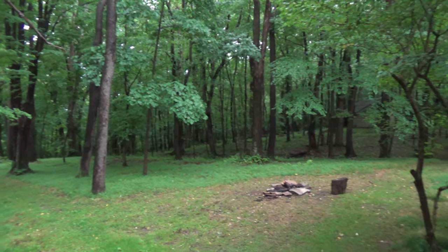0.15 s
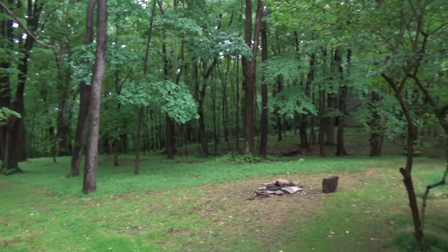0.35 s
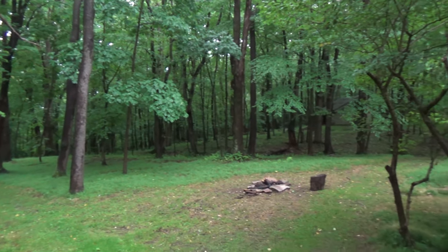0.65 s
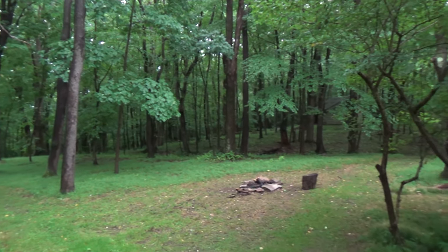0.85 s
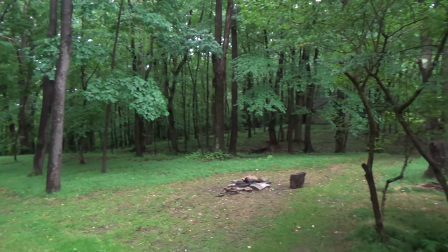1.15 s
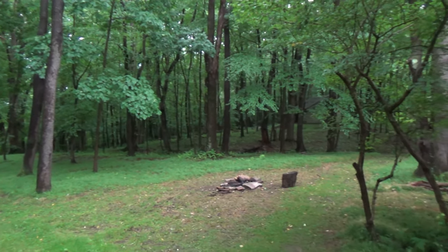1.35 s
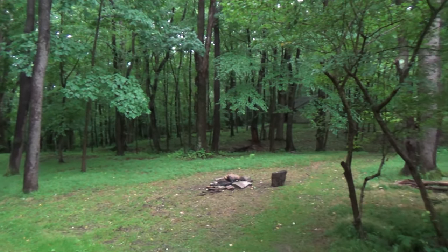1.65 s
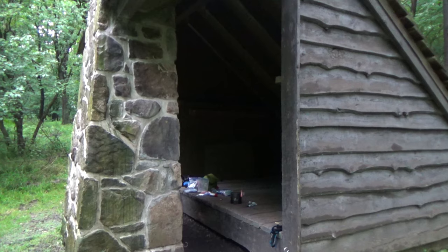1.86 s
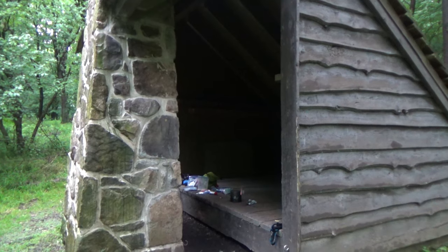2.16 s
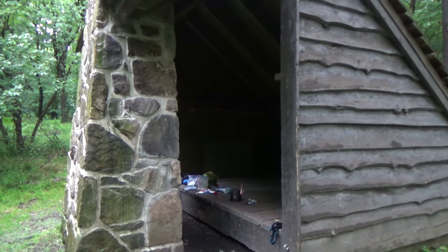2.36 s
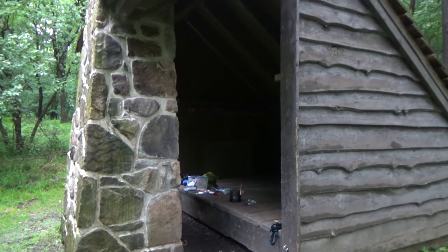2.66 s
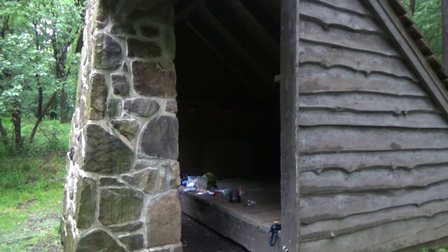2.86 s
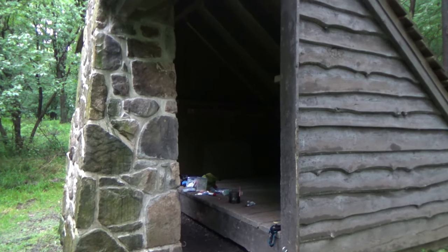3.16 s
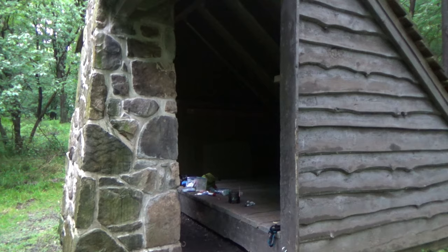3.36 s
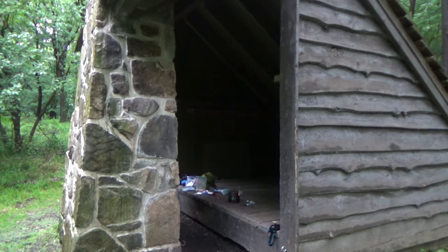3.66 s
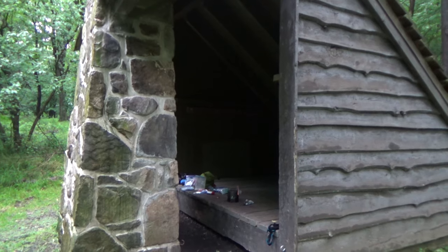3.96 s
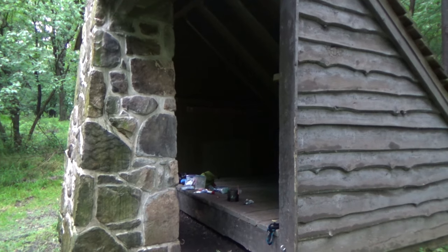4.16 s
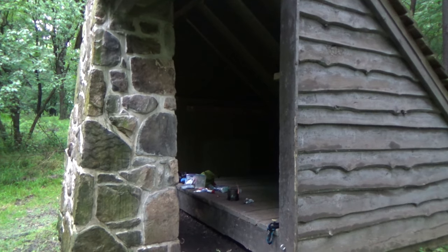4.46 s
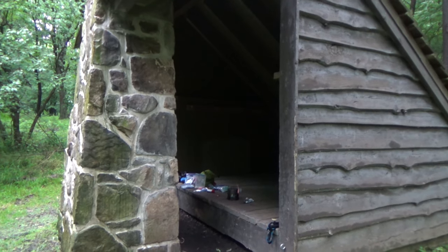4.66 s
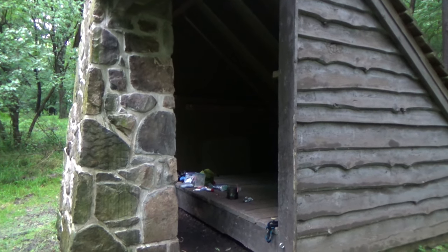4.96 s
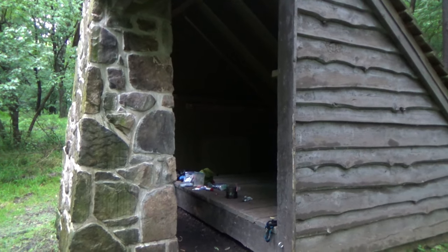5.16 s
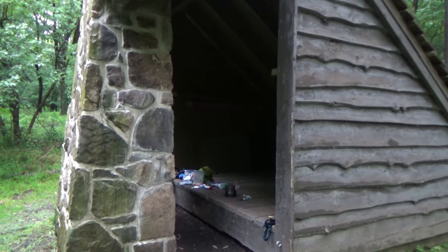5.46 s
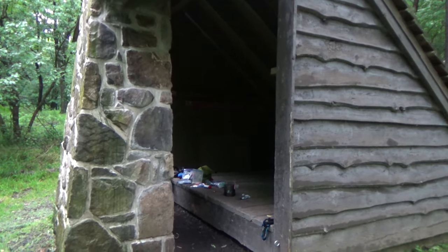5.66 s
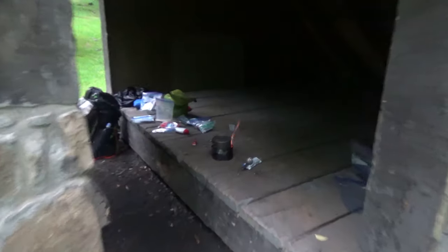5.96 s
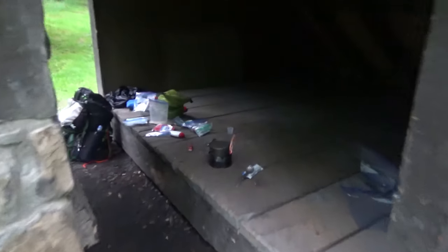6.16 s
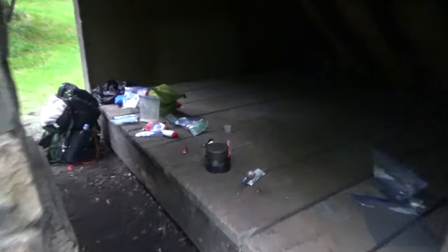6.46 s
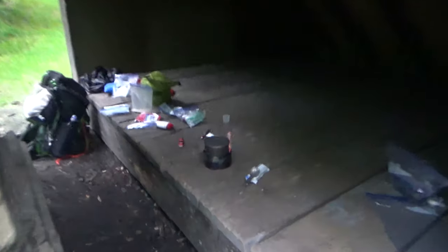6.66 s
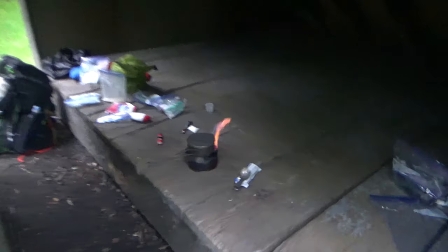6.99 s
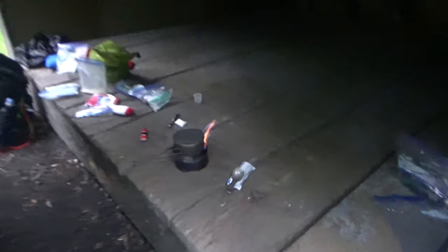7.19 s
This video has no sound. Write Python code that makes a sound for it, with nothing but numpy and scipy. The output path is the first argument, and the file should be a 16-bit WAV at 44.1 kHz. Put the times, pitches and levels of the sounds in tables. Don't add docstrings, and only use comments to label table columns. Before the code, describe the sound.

Three outdoor shots joined by hard cuts. First, sparse distant birdsong in a reverberant wood, with faint camera-body clicks. Next, brighter chirps and a steady two-second trill, about thirteen syllables a second, over a faint low engine drone. Last, a sharp, hard footstep among loose stones, gritty scraping, a second softer step and one final clack. Hissy stereo camera microphone, leaf rustle and far traffic throughout.

```python
import sys
import numpy as np
from scipy import signal
from scipy.io import wavfile
from scipy.ndimage import uniform_filter1d

SR = 44100
rng = np.random.default_rng(int(sys.argv[2]) if len(sys.argv) > 2 else 0)


def decibels_to_gain(level_db):
    exponent = np.asarray(level_db, float) / 20
    return 10 ** exponent


def to_wav(sig):
    pcm = np.clip(np.atleast_2d(sig), -1, 1) * 32767
    pcm = np.round(pcm).astype(np.int16)
    wavfile.write(sys.argv[1], SR, pcm.T)


N = 323208

CUTS = [0, 1.862, 5.9285]


def evened(x):
    return x / np.sqrt(np.mean(x ** 2) + 1e-20)


def slow_noise(count, size):
    noise = uniform_filter1d(rng.standard_normal(count), size=size)
    return evened(uniform_filter1d(noise, size=size))


def read(points, hz):
    f, value = np.transpose(points)
    return np.interp(np.log(hz + 1), np.log(f + 1), value)


def curves(rows, t):
    s, *columns = np.transpose(rows)
    return [np.interp(t, s, c) for c in columns]


def add(mix, s, sound, pan_db=0):
    part = mix[:, round(s * SR):][:, :len(sound)]
    part += sound[:part.shape[1]] * decibels_to_gain(np.array([[pan_db / 2], [-pan_db / 2]]))


def side_share(likeness):
    return np.sqrt((1 - likeness) / (1 + likeness))


def resonate(x, hz, width):
    turn = np.exp(2j * np.pi * np.cumsum(hz * np.ones(len(x))) / SR)
    r = np.exp(-np.pi * width / SR)
    return 2 * (turn * signal.lfilter([1 - r], [1, -r], x / turn)).real


def coloured(x, points):
    level_db = read(points, abs(np.fft.fftfreq(4096, 1 / SR)))
    log_gain = np.log(decibels_to_gain(np.maximum(level_db, -100)))
    taps = np.fft.ifft(np.exp(np.conj(signal.hilbert(log_gain)))).real[:1024]
    return evened(signal.oaconvolve(x, taps[None], axes=1)[:, :N])


SHAKE = slow_noise(SR, 60)


def glide(length, start_hz, end_hz, burr_hz, bend, taper):
    u = np.linspace(0, 1, int(length * SR) + 2)
    wobble = np.roll(SHAKE, int(start_hz * 7.0))[:len(u)]
    hz = start_hz + (end_hz - start_hz) * u ** bend + burr_hz * 2 * np.tanh(wobble / 2)
    tone = np.sqrt(2) * np.sin(2 * np.pi * np.cumsum(hz) / SR)
    return tone * signal.windows.tukey(len(u), taper) * decibels_to_gain(-3 * u)


# (frequency [Hz], t60 [s])
TRUNKS = [(1500, 0.69), (4000, 1), (9000, 0.67)]


def trees(x, direct_db, likeness, depth, flutter_db):
    taps = np.zeros((2, SR))
    at = np.arange(200, SR - 20, 20) + rng.integers(0, 20, (2, (SR - 201) // 20))
    np.put_along_axis(taps, at, rng.choice([-1., 1.], at.shape), 1)
    hz, t, z = signal.stft(taps, SR, nperseg=256)
    decay = decibels_to_gain(-60 * t / depth / read(TRUNKS, hz)[:, None])
    mid, side = signal.istft(z * decay, SR, nperseg=256)[1]
    side = side_share(likeness) * side
    tail = np.array([mid + side, mid - side])
    tail = tail / np.linalg.norm(tail[0])
    out = decibels_to_gain(direct_db) * x
    flutter = decibels_to_gain(flutter_db * slow_noise(N, 600))
    edges = [round(s * SR) for s in CUTS] + [N]
    for a, b in zip(edges, edges[1:]):
        echo = signal.fftconvolve(x[:, a:b], tail, axes=1)[:, :b - a]
        out[:, a:b] += echo * flutter[a:b]
    return out


# (time [s], length [s], start [Hz], end [Hz], level [dB])
LOW_BIRD = [(0.2, 0.12, 2080, 1943, -69.5), (0.35, 0.14, 1950, 1860, -72), (1.24, 0.062, 2270, 2180, -59),
            (1.33, .05, 2195, 2185, -64), (1.42, .09, 2190, 2175, -68), (1.53, 0.021, 2050, 1900, -67),
            (3.335, 0.055, 2290, 1960, -64), (3.39, 0.11, 1990, 1890, -70), (3.58, 0.076, 2770, 2710, -68),
            (4.65, 0.13, 2166, 2116, -69), (4.885, 0.04, 1900, 1850, -63.5), (4.985, .03, 1880, 1850, -66),
            (4.92, 0.067, 2210, 2216, -56.5), (4.98, 0.03, 2200, 2196, -58), (5.06, 0.034, 1870, 1840, -65),
            (5.14, 0.032, 2180, 2210, -72)]
MIDDLE_BIRD = [(0.0, 0.18, 3504, 2486, -68), (0.8, 0.052, 3150, 3450, -64), (0.83, 0.06, 3250, 3900, -59),
               (0.875, 0.045, 4050, 4300, -63), (0.9, 0.058, 4090, 4400, -60),
               (0.939, 0.26, 4410, 4460, -65.5), (1.56, 0.057, 3660, 3490, -59),
               (1.59, 0.056, 3460, 2940, -60), (1.62, 0.07, 3130, 2394, -62),
               (1.78, 0.074, 2650, 3070, -63), (2.83, .08, 4410, 3220, -67), (2.9, 0.05, 2650, 3004, -58),
               (2.97, 0.045, 2906, 2310, -65), (3.11, 0.1, 2900, 3300, -70), (3.497, .015, 1900, 3030, -51),
               (3.51, 0.06, 2950, 3240, -57), (3.56, 0.044, 3130, 2960, -60),
               (3.58, 0.054, 3300, 3950, -61.5), (4.45, 0.086, 2805, 3430, -55),
               (4.51, 0.086, 3330, 4220, -55), (4.52, 0.096, 3200, 2254, -56.5),
               (4.6, 0.087, 4080, 4470, -59), (4.89, 0.067, 2850, 2610, -61), (5.0, 0.12, 2594, 3700, -61),
               (5.14, .12, 3800, 2700, -63), (5.78, 0.07, 3540, 3440, -63),
               (5.795, 0.088, 3180, 2430, -59.5)]
HIGH_BIRD = [(1.6, 0.2, 5090, 4570, -72), (1.78, 0.068, 5280, 4560, -70), (1.862, 0.091, 7750, 5400, -59),
             (1.98, 0.099, 8200, 7400, -62), (2.042, 0.1, 7320, 7330, -62),
             (2.067, 0.11, 7270, 6260, -58.5), (2.17, 0.1, 4850, 6180, -59.5),
             (2.28, 0.048, 6870, 4600, -58.5), (3.05, 0.2, 4430, 4250, -70), (5.3, 0.12, 5100, 4600, -66),
             (5.62, 0.11, 4600, 4900, -70), (5.72, 0.063, 5360, 4740, -62.5),
             (6.4, 0.12, 3100, 3960, -60.5)]
# (notes, burr of a level note [Hz], added burr [share of the glide])
SINGERS = [
    (LOW_BIRD, 19, .02),
    (MIDDLE_BIRD, 46, 0.245),
    (HIGH_BIRD, 139, 0.111),
]


def far_birds():
    mix = np.zeros((2, N))
    for notes, level_burr_hz, share in SINGERS:
        for s, length, start_hz, end_hz, db in notes:
            burr_hz = level_burr_hz + share * abs(end_hz - start_hz)
            note = glide(length, start_hz, end_hz, burr_hz, bend=.7, taper=0.14)
            add(mix, s, decibels_to_gain(db + 2.5) * note)
    return trees(mix, direct_db=-5.0, likeness=0.5, depth=1.56, flutter_db=1.8)


TRILL_START, TRILL_END, TRILL_PER_S = 3.1546, 4.977, 12.68


def effort(full_db, shy_db, settle_s, swell_db):
    t = np.arange(N) / SR
    shortfall_db = shy_db * np.exp(-np.maximum(t - TRILL_START, 0) / settle_s)
    stop_db = 230 * np.maximum(t - TRILL_END, 0)
    return full_db - shortfall_db + swell_db * (t - TRILL_END) - stop_db


# (start [syllable], end [syllable], start [Hz], end [Hz], level [dB])
BUZZ = [
    (0.027, 0.36, 4880, 5600, -3),
    (0.31, 0.651, 5540, 5865, -1),
    (0.619, 1.0, 5602, 4700, -4.5),
    (.3, .55, 6050, 6450, -13),
]
WHISTLE = [
    (0.0998, 0.444, 5900, 5600, -9),
    (0.64, 0.876, 8800, 7450, -1),
    (0.87, 1.06, 8600, 7460, 1.5),
    (0.2, 0.46, 8300, 7500, -7),
    (.56, .7, 8900, 7950, -6),
]
# (full level [dB], shortfall at the start [dB], its time constant [s], swell [dB/s])
BUZZ_EFFORT = (-42, 20, .22, 1)
WHISTLE_EFFORT = (-46.5, 9, 0.34, 3.5)


def trill():
    buzz, whistle = np.zeros((2, 2, N))
    starts = np.arange(TRILL_START, TRILL_END + 1 / TRILL_PER_S, 1 / TRILL_PER_S)
    chance = rng.standard_normal((40, 3))
    for s, (late, sharp, loud) in zip(starts, chance):
        tune = 1 + 0.006 * sharp + .018 * np.exp((TRILL_START - s) / 0.226)
        for mix, parts, burr_hz, bend in ((buzz, BUZZ, 350, .9), (whistle, WHISTLE, 40, .15)):
            for a, b, f0, f1, db in parts:
                note = glide((b - a) / TRILL_PER_S, f0 * tune, f1 * tune, burr_hz, bend, taper=0.16)
                add(mix, s + a / TRILL_PER_S + .002 * late, decibels_to_gain(db + 0.73 * loud) * note)
    buzz = buzz * decibels_to_gain(effort(*BUZZ_EFFORT) - 0.86)
    whistle = whistle * decibels_to_gain(effort(*WHISTLE_EFFORT) + 2.0)
    return trees(buzz + whistle, direct_db=-6.0, likeness=0.71, depth=0.93, flutter_db=0.5)


# (time of full weight [s], rise [s], grinding [dB], release [dB/s], grit re grinding [dB])
SHOVES = [
    (5.972, 0.033, -23, 420, -5.5),
    (5.952, 0.012, -31, 106, 0.5),
    (6.102, .035, -39.5, 112, -4),
    (6.18, .1, -50.5, 10.5, -4.5),
    (5.7, 0.0085, -46.5, 90, -8),
    (6.57, 0.021, -40, 300, 4.5),
    (6.58, 0.07, -40, 46, -6),
    (6.8, 0.21, -42.5, 144, 1),
    (6.87, 0.056, -58, 250, 9),
    (7.316, .03, -49, 400, -6),
]


def shoves(t):
    stone, grit = decibels_to_gain(-69) ** 2, decibels_to_gain(-55) ** 2
    for s, rise_s, db, release_db, grit_db in SHOVES:
        rise = np.clip(1 + (t - s) / rise_s, 0, 1)
        power = (rise * decibels_to_gain(db - release_db * np.maximum(t - s, 0))) ** 2
        stone, grit = stone + power, grit + power * decibels_to_gain(grit_db) ** 2
    return np.sqrt(stone), np.sqrt(grit)


def grains(per_s, spread_db, likeness):
    size = decibels_to_gain(spread_db * np.minimum(rng.exponential(1, N), 3.2)) * (rng.random(N) < per_s / SR)
    size = signal.lfilter([1], [1, -.96], size) + 1.17
    mid, side = rng.standard_normal((2, N)) * size
    side = side_share(likeness) * side
    return np.array([mid + side, mid - side])


# (frequency [Hz], level per Hz [dB])
GRAVEL = [(88, -27.5), (150, -29), (203, -19), (239, -5.5), (300, -10), (600, -11), (657, -2), (2230, -2),
          (2960, 1.5), (5500, -9.5), (7150, -44), (12100, -120)]
GRIT = [(2350, -19), (4000, -4.5), (5700, -3.5), (9490, 3), (11500, -8), (15300, -18), (16000, -58)]
# (time [s], left-right [dB], ring of the stones [Hz])
BOOT = [(5.93, -1, 1600), (5.975, 3.5, 1870), (6.08, 2, 1550), (6.5, 2, 1510), (6.6, 4, 2030),
        (6.68, -3, 2160), (6.81, 4.5, 1700), (6.9, 2, 1080), (7.33, 0.5, 1300)]


def crunch():
    t = np.arange(N) / SR
    (stone, grit), (side_db, ring_hz) = shoves(t), curves(BOOT, t)
    pan_db = .3 * side_db
    grind = coloured(grains(650, 2.4, 0.94), GRAVEL)
    ring = np.array([resonate(resonate(x, ring_hz, 1700), ring_hz, 1700) for x in grind])
    grind = evened(1.1 * grind + ring)
    mix = decibels_to_gain(-2.5) * stone * grind
    mix += decibels_to_gain(-1.86) * grit * coloured(grains(650, 2.3, 0.92), GRIT)
    return mix * decibels_to_gain(np.array([pan_db / 2, -pan_db / 2])) * (t > CUTS[2])


def clicks(rows, turns, bright_t60, rattle_db, low_db, bright_db):
    mix, t = np.zeros((2, N)), np.arange(700) / SR
    chance = rng.standard_normal((len(rows), 700))
    cavity = signal.butter(2, [7200, 11200], "band", fs=SR, output="sos")
    for (s, db, hz, rel_db, pan_db), noise in zip(rows, chance):
        soft = 1 - np.exp(-t * hz * 4)
        low = soft * np.sin(2 * np.pi * hz * t) * decibels_to_gain(low_db - 60 * t * hz / turns)
        rattle = evened(resonate(resonate(noise, hz, 1800), hz, 1000))
        rattle = soft * rattle * decibels_to_gain(rattle_db - 60 * t / 0.033)
        bright = evened(signal.sosfilt(cavity, noise))
        bright = bright * decibels_to_gain(rel_db + bright_db - 60 * t / bright_t60)
        add(mix, s, decibels_to_gain(db) * (low + rattle + bright), pan_db)
    return mix


# (time [s], peak [dB], low ring [Hz], bright part re peak [dB])
STONES = [(5.929, -28, 1920, -27.5), (5.942, -30, 1400, -23), (5.953, -23.5, 930, 3.5),
          (5.9685, -16, 2280, -13), (5.983, -35, 2140, -19), (6.0132, -32, 1590, 0),
          (6.045, -28, 1520, -12), (6.096, -33, 1190, -7), (6.105, -28, 1470, -3), (6.127, -29, 1880, -10),
          (6.173, -34.5, 1560, -2.5), (6.233, -30, 1600, -21), (6.24, -21, 1590, -24),
          (6.294, -42, 1700, -11), (6.345, -39, 2430, -6), (6.515, -36, 2160, -15), (6.549, -31, 690, -15),
          (6.566, -30, 3040, 1.5), (6.614, -34, 2350, -9), (6.674, -26, 2260, -23), (6.686, -25, 2200, -24),
          (6.702, -27.5, 1900, -12), (6.726, -28.5, 1830, -11), (6.748, -23, 1860, -28),
          (6.781, -29.5, 1760, -19), (6.812, -32.5, 2470, 1), (6.845, -46, 789, 10),
          (6.98, -44.5, 1050, 6.5), (7.289, -39, 770, -5), (7.327, -19, 1380, -28)]


def clacking_stones():
    rows = [(*row, curves(BOOT, row[0])[0]) for row in STONES]
    return clicks(rows, turns=14.0, bright_t60=0.015, rattle_db=-8.5, low_db=1.0, bright_db=2.0)


# (time [s], peak [dB], ring [Hz], bright part re peak [dB], left-right [dB])
CHIPS = [(5.9299, -23, 1710, -6, 3), (5.9487, -12, 1340, -1, -1), (5.9768, -10, 2210, -11, 5),
         (5.984, -9.5, 2290, -10, 2), (5.9977, -16, 1870, -4, 0), (6.03, -28, 2270, -6, 2),
         (6.0357, -22, 2010, -9, 0), (6.0884, -22.5, 1740, -11, 2), (6.1171, -23.5, 1250, -6, 1),
         (6.1559, -26, 1830, -6, 2), (6.257, -36, 1560, -6, 2), (6.3524, -33, 1980, -6, 2),
         (6.3744, -35, 1850, -6, 2), (6.4056, -36, 1640, -4, 2), (6.4898, -32, 3080, -6, 2),
         (6.5714, -22, 4050, -1, 4), (6.5922, -28, 2480, -6, 2), (6.6254, -28, 2080, -6, 2),
         (6.6684, -24, 2270, -9, 4), (6.696, -23, 1780, -6, 2), (6.7544, -27, 1680, -6, 2),
         (6.758, -31, 1600, -6, 2), (6.7944, -26, 1160, -8, 0), (6.8114, -24, 2520, -6, 1),
         (6.8614, -32, 1160, -3, 2), (6.898, -38, 1640, -8, 2)]


def stone_chips():
    return clicks(CHIPS, turns=5.9, bright_t60=0.0064, rattle_db=-16, low_db=-1.5, bright_db=-8.5)


def single_swings(rows):
    mix, t = np.zeros((2, N)), np.arange(4000) / SR
    for s, db, hz in rows:
        add(mix, s, decibels_to_gain(db) * np.sin(2 * np.pi * hz * t) * (t * hz < 1))
    return mix


def dull_rings(rows, t60, trim_db=0):
    mix, t = np.zeros((2, N)), np.arange(4000) / SR
    for s, db, hz in rows:
        add(mix, s, decibels_to_gain(db + trim_db - 60 * t / t60) * np.sin(2 * np.pi * hz * t))
    return mix


# (time [s], peak [dB], frequency
# [Hz])
CRACKS = [(5.9296, -24, 2320), (5.9531, -19, 1500), (5.9669, -16.5, 1300), (5.9835, -13, 2220),
          (6.2394, -23.5, 2620), (6.345, -31, 4500), (6.747, -27, 2100), (6.375, -38, 3000),
          (6.407, -40, 6000), (6.257, -40, 7000), (6.8118, -25, 3500), (5.637, -46, 2500),
          (5.745, -52, 4000)]


def splitting_stones():
    return single_swings(CRACKS)


# (time [s], peak [dB], frequency [Hz])
THUDS = [
    (5.954, -23, 510),
    (5.966, -31, 300),
    (5.946, -36, 970),
    (5.961, -18, 1000),
    (5.969, -20, 845),
    (6.562, -27, 720),
    (7.29, -51, 815),
    (7.321, -33, 880),
]


def heel_thuds():
    return dull_rings(THUDS, t60=0.017, trim_db=-4.5)


# (time [s], peak [dB], frequency [Hz])
THUMPS = [
    (5.95, -61, 59.7),
    (6.07, -45, 32),
    (6.56, -45, 30),
]


def camera_jolts():
    return dull_rings(THUMPS, t60=.12)


# (time [s], peak [dB], low ring [Hz], bright part re peak [dB], left-right [dB])
TICKS = [(0.311, -61, 700, 10.5, 7), (0.559, -58, 912, 0, 3), (0.592, -48.5, 593, -19, -6),
         (0.787, -40.5, 1930, -4, 6), (1.179, -55, 1020, -4, 3), (1.692, -45, 3240, -5, -8),
         (1.7198, -45, 754, 5, -3.5), (2.119, -54, 724, 3, -7), (2.311, -57, 1110, 2, -1.0),
         (2.369, -62, 700, 7, 4), (2.429, -60, 748, -1, 1.0), (3.039, -57, 2950, -11, 0.0),
         (3.154, -48.5, 3080, -10, 0.5), (3.679, -58, 3180, -5.5, 0.5), (3.989, -58, 886, 3, 0.0),
         (4.059, -51, 830, 0.5, 5), (4.299, -47.5, 1210, -5, 6), (4.432, -54, 738, 0, 1.5),
         (4.959, -55, 2220, 1, 2.5), (5.209, -44, 1770, -25.5, -1.5), (5.309, -56, 705, 1, 3),
         (5.635, -49, 1500, -13, 3)]


def camera_ticks():
    return clicks(TICKS, turns=4.5, bright_t60=0.0097, rattle_db=-3.5, low_db=9.0, bright_db=6.0)


# (time [s], peak [dB], frequency [Hz])
POPS = [
    (1.6868, -34, 3600),
    (1.6918, -31, 3300),
    (1.7196, -36, 4500),
    (3.8851, -33.5, 1050),
    (3.891, -32, 1150),
    (3.9003, -38, 1100),
]


def snaps_and_drips():
    return single_swings(POPS)


# (time [s], frequency [Hz], level [dB])
DRONE = [(1.87, 112, -63), (2.4, 111, -60.5), (3.0, 109.3, -62.5), (3.85, 112, -58), (5.26, 112.6, -53.5),
         (5.85, 110.4, -54), (6.04, 116.6, -64), (7.24, 122, -55.5)]
# (frequency [Hz], width [Hz], level [dB])
WHINES = [
    (211.6, 6, -71),
    (13200, 90, -81),
]


def hums():
    t = np.arange(N) / SR
    hz, db = curves(DRONE, t)
    out = decibels_to_gain(db - 3) * evened(resonate(rng.standard_normal(N), hz, 4.4)) * (t > CUTS[1])
    for f, width, level_db in WHINES:
        out += decibels_to_gain(level_db) * evened(resonate(rng.standard_normal(N), f, width))
    return out


# (frequency [Hz], level per Hz [dB])
AIR = [(140, -30), (230, -5), (413, -6), (452, -5.5), (520, -6), (633, -4), (826, -2.5), (886, -6),
       (952, -4.5), (1460, -8), (1970, -8.5), (3070, -7), (4080, -8.5), (9730, -10), (16000, -24.5)]
TRAFFIC = [(12, -42.5), (20, -12), (48, -8.5), (103, 2), (119, -11), (140, -6), (183, -6.5), (211, -7),
           (237, -18), (320, -22), (420, -46), (700, -120)]
# (frequency [Hz], left-right likeness [-1 to 1])
SAME = [(60, 0.99), (130, 1), (290, 0.78), (640, 0.54), (1410, 0.4), (3100, 0.48), (6820, 0.68),
        (15000, 1.0)]
# (leaves [dB], hiss re leaves [dB], traffic [dB])
SHOTS = [
    (-59.5, -6, -59.5),
    (-59.5, -4.5, -58.5),
    (-55.5, -7.5, -58.5),
]
# (time [s], swell [dB])
BREEZE = [(0, 0.5), (2.1, 0), (3.37, -1), (3.98, 2.5), (5.04, 2.5), (5.9, 0.5), (6.5, 0), (7.0, 1.5),
          (7.33, 0)]


def background():
    frames, hz = N // 512 + 5, np.fft.rfftfreq(2048, 1 / SR)
    a, b, c, d, patches = rng.standard_normal((frames, 1025, 5)).T
    patches = evened(uniform_filter1d(uniform_filter1d(patches, 20, 0), 6, 1))
    t = np.arange(frames) * 512 / SR
    shot = np.searchsorted(CUTS, t, "right") - 1
    leaves_db, hiss_db, traffic_db = np.transpose(SHOTS)[:, shot]
    swell_db = curves(BREEZE, t)[0]
    spread = side_share(np.clip(read(SAME, hz), -.5, 1))[:, None]
    mid, side = a + 1j * b, spread * (c + 1j * d)
    z = np.array([mid + side, mid - side]) / np.sqrt(1 + spread ** 2)
    high = np.clip(np.log2(hz[:, None] / 1500 + 1e-9) / 2, 0, 1)
    air_db = read(AIR, hz)[:, None] + leaves_db + swell_db + high * hiss_db
    air = decibels_to_gain(air_db - 12.5 + 0.8 * patches)
    rumble = decibels_to_gain(read(TRAFFIC, hz)[:, None] + traffic_db + swell_db - 5.5)
    sound = signal.istft(z * np.hypot(air, rumble), nperseg=2048, noverlap=1536)[1]
    return 27.7 / 27.0 * sound[:, :N]


def scene():
    birds = far_birds() + trill()
    boots = crunch() + clacking_stones() + stone_chips() + splitting_stones() + heel_thuds()
    camera = camera_jolts() + camera_ticks() + snaps_and_drips()
    return birds + boots + camera + hums() + background()


def roll_off(x):
    return signal.sosfilt(signal.butter(12, 16460, fs=SR, output="sos"), x)


def record(dry):
    ceiling = .3
    left, right = ceiling * np.tanh(dry / ceiling)
    mid, side = (left + right) / 2, (left - right) / 2
    side = signal.sosfilt(signal.butter(1, [30, 11000], "band", fs=SR, output="sos"), side)
    edge = signal.firwin(255, 16000, window=("kaiser", 8), fs=SR)
    mix = signal.oaconvolve(np.array([mid + side, mid - side]), edge[None], "same")
    return roll_off(mix)


dry = scene()
out = record(dry)
to_wav(out)
```